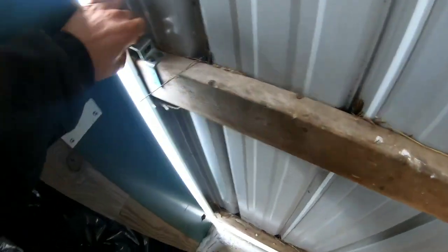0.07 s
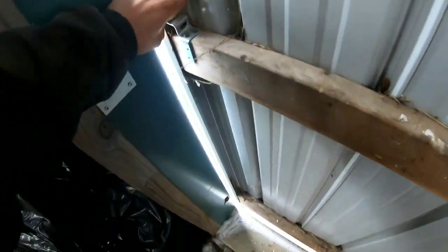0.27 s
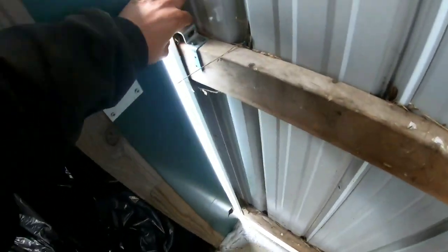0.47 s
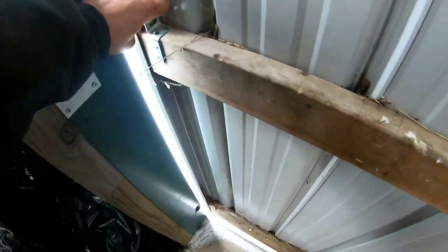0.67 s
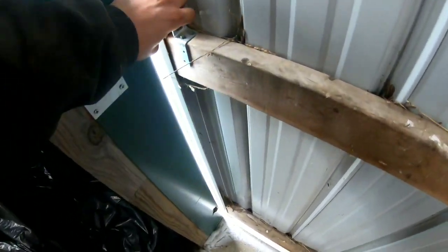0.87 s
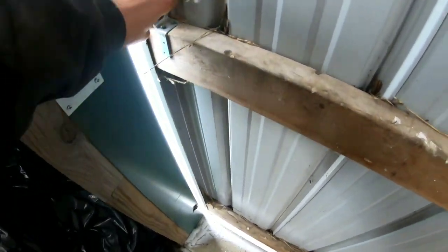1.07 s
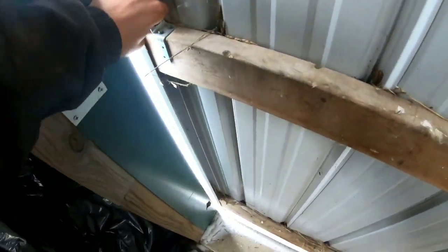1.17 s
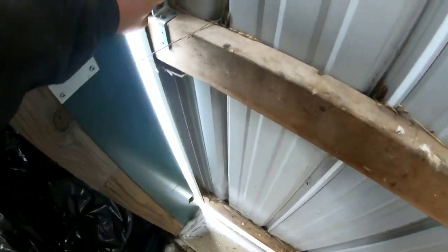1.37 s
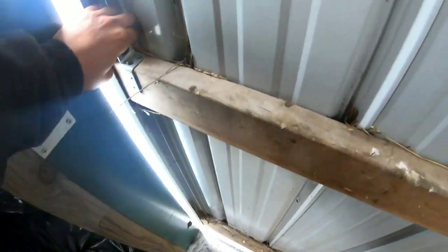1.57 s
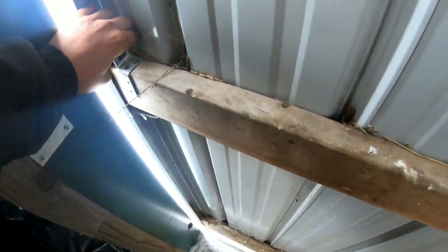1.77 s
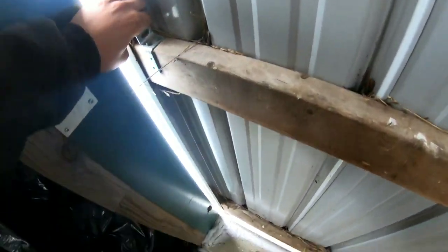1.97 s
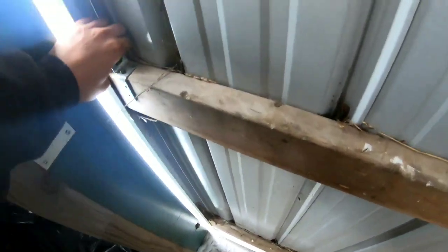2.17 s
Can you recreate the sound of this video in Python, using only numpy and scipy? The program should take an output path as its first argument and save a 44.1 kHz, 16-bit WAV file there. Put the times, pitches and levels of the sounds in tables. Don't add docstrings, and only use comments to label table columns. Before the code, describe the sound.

Close to a small camera microphone, a metal bolt knocks, chatters and rubs in its guides at uneven intervals, while shoves make the sheet-metal door boom deeply; the loudest clanks come early and late.

```python
import sys
import numpy as np
from scipy import signal
from scipy.fft import rfft, irfft
from scipy.io import wavfile
from scipy.ndimage import uniform_filter1d

SR = 44100
rng = np.random.default_rng(int(sys.argv[2]) if len(sys.argv) > 2 else 0)


def dump_mix(stems):
    frames = np.atleast_2d(stems).T
    limited = np.clip(frames, -1, 1)
    pcm = np.round(limited * 32767).astype(np.int16)
    wavfile.write(sys.argv[1], SR, pcm)


def how_loud(loudness_db):
    steps = np.asarray(loudness_db, float) / 20
    return 10 ** steps


N = 97372

# frequency in Hz, density in dB per Hz.
BLOW_SPECTRUM = [(120, -24), (200, 6), (1040, -12), (1350, -14), (2800, -14), (4200, -20), (4680, -14),
                 (6880, -21), (16000, -49)]
SMEAR_S = 0.0012
LEAD_S = 0.03


def bolt():
    # time in s, strength in dB, dull part in dB, bright part in dB, chatter length in s.
    knocks = [(.2795, -18, -10.5, -5, 0.015), (.299, -2.5, -17, -16.5, 0.012),
              (.6645, -20.5, -6.5, -25, 0.0066), (.922, -16.5, -7, -25.5, 0.0042),
              (1.118, -16, -9, -2, 0.01), (1.3575, -15.5, -23.5, -26, 0.007),
              (1.503, -7.5, -11.5, -34.5, 0.0078), (1.566, -12, -36, -9.5, 0.0068),
              (1.709, -13.5, -17.5, -24, 0.0053), (1.7835, -18.5, -12.5, -2.5, 0.007),
              (2.005, -12.5, -29.5, -21, 0.0079), (2.0535, -2, -12, -10.5, 0.0035),
              (2.1285, -12, -16, -11, 0.014), (2.138, -6.5, -37, -8.5, 0.0049)]
    # time in s, strength in dB, dull part in dB, bright part in dB, chatter length in s.
    ticks = [(.06, -31.5, -14.5, -18.5, 0.029), (.164, -34, -10.5, -56, 0.031),
             (.314, -40, -30, -19, 0.0089), (1.136, -37, -14, -9, 0.0065), (.367, -22, -8, -15, 0.018),
             (.416, -31, -20, -19.5, 0.013), (.713, -29.5, -13, -12.5, 0.0048),
             (.882, -16.5, -2.5, -44, 0.02), (1.019, -22.5, 10, -15, 0.018),
             (1.085, -25.5, -3, -20, 0.0039), (1.275, -38, -9, 2, 0.091), (1.325, -26, 0, -19, 0.02),
             (1.458, -26.5, -4, -41, .006), (1.869, -39.5, -25, -4, 0.013), (1.944, -27, 9.5, -1, 0.0084)]
    # middle in s, strength in dB rms, dull part in dB, bright part in dB, length in s.
    scrapes = [(0.262, -34.5, -4, -22, .04), (0.288, -28.5, -16, -32, 0.021), (.355, -32.5, -14, -25, .17),
               (0.639, -46, -5, -9, 0.072), (.965, -37, -1, -15, .05), (1.03, -32, -5.5, -14.5, .04),
               (1.11, -43, -10, -3, 0.028), (1.144, -44, -7.5, -1, 0.059), (1.34, -36, -5, -20, 0.032),
               (1.566, -39, -6, -11, 0.045), (1.767, -48, -5, 1, 0.032), (1.991, -38.5, 1, -15, 0.074),
               (2.025, -33.5, -12, -24, 0.047), (2.044, -30, -17, -15, .024), (2.117, -48, 7, -5, .03),
               (2.174, -42, -21, -34, 0.067)]
    # time in s, strength in dB, pitch in Hz, rattle length in s.
    clanks = [(0.162, -38.5, 800, 0.0093), (0.297, -20.5, 1400, 0.015), (0.295, -20.5, 4940, 0.013),
              (0.672, -28, 1700, 0.0039), (.923, -25.5, 1160, 0.027), (1.371, -30, 2550, 0.021),
              (1.503, -21, 1236, 0.017), (1.567, -22, 6330, 0.0066), (1.614, -44.5, 1880, 0.31),
              (0.673, -39, 3340, 0.0043), (1.825, -41.5, 1850, 0.037), (1.919, -46, 6300, 0.0056),
              (2.002, -21, 2420, 0.015), (2.013, -18, 520, .012), (2.053, -10.5, 1730, 0.00084),
              (2.054, -16, 5370, 0.0056), (2.127, -18, 1400, 0.018)]
    cracks, rings = np.zeros(N), np.zeros(N)
    for contacts, rise_s in ((knocks, 0.0005), (ticks, 0.002)):
        for s, *row in contacts:
            crack, rung = knock(*row, rise_s)
            add(cracks, s - LEAD_S, crack)
            add(rings, s - LEAD_S, rung)
    for s, db, dull_db, bright_db, length_s in scrapes:
        add(cracks, s - length_s / 2, scrape(db, dull_db, bright_db, length_s))
    for s, *row in clanks:
        add(rings, s, clank(*row))
    return cracks, rings


def knock(db, dull_db, bright_db, length_s, rise_s):
    # frequency in Hz, level in dB, t60 in s.
    latch = [(1400, -2, 0.46), (2080, -16.5, 0.22), (2780, -15.5, 0.25), (3580, 0.5, 0.65),
             (4620, 2.5, 0.093), (6700, -15, 0.094)]
    first_db, lead_db, lead_rise_s = 10, -23, 0.018
    treble_hz, treble_shorter = 7350, 0.73
    crack_db, latch_db = -3.5, -16.5
    t = np.arange(4096) / SR - LEAD_S
    after = np.maximum(t, 0)
    slide = how_loud(lead_db) * np.exp(np.minimum(t, 0) / lead_rise_s) * (t < 0)
    start = np.minimum((after + 1 / SR) / rise_s, 1) * (t >= 0)

    drive = chatter(4096)
    drive[np.argmax(t >= 0)] = how_loud(first_db)
    low = signal.sosfilt(signal.butter(2, treble_hz, fs=SR, output="sos"), drive)
    treble = drive - low
    low = low * (slide + start * np.exp(-after / length_s))
    treble = treble * start * np.exp(-after / (treble_shorter * length_s))

    crack = signal.fftconvolve(low + treble, smear(SMEAR_S))
    crack = signal.fftconvolve(crack, blow_colour(dull_db, bright_db))
    crack = how_loud(db + crack_db) * crack / np.abs(crack).max()
    rung = signal.fftconvolve(crack, ring(latch, damp=0.25, vary_db=4))
    return crack, how_loud(latch_db) * rung


def scrape(db, dull_db, bright_db, length_s):
    # frequency in Hz, gain in dB.
    dulling = [(8500, -4), (16000, -5)]
    swell = np.sin(np.pi * np.clip(np.arange(8192) / SR / length_s, 0, 1)) ** 2
    slips = signal.fftconvolve(chatter(8192), blow_colour(dull_db, bright_db, dulling))[:8192]
    return how_loud(db) * swell * evened(slips)


def clank(db, hz, length_s):
    mode_cycles = 2.23
    t = np.arange(8192) / SR
    drive = chatter(8192) * np.exp(-t / max(length_s, 0.001))
    mode = t * np.sin(2 * np.pi * hz * t) * np.exp(-2 * t * hz / mode_cycles)
    sound = signal.fftconvolve(drive, mode)
    return how_loud(db) * sound / np.abs(sound).max()


def chatter(size):
    return clicks(per_s=9000, spread_db=3, size=size)


def blow_colour(dull_db, bright_db, *more):
    tilt = [(800, dull_db + 10.5), (2700, 0), (8000, bright_db + 10.5)]  # (Hz, dB)
    return colour(BLOW_SPECTRUM, tilt, *more)


def sheet():
    # frequency in Hz, t60 in s.
    decay = [(300, 0.42), (800, 0.22), (2000, 0.24), (5000, 0.13), (12000, 0.12)]
    hz, t, z = signal.stft(rng.standard_normal(16384), SR, nperseg=256)
    fade = how_loud(-60 * t / read(decay, hz)[:, None])
    return unit(signal.istft(z * fade, SR, nperseg=256)[1])


def rubbing():
    # frequency in Hz, density in dB per Hz.
    spectrum = [(230, -20.5), (450, -13), (1200, -17.5), (2170, -27), (3600, -28.5), (4120, -32),
                (8300, -42.5), (9300, -53.5), (16000, -60)]
    # frequency in Hz, level in dB, t60 in s.
    modes = [(1450, -4, .008), (4800, 0, 0.01), (6900, -9, 0.008)]
    ring_db, hiss, patch_db, level_db = -14, 0.76, 3.1, 9
    slips = evened(clicks(per_s=3000, spread_db=2, size=N)) + hiss * rng.standard_normal(N)
    slips = slips + how_loud(ring_db) * signal.fftconvolve(slips, ring(modes, size=2048))[:N]
    z = signal.stft(signal.fftconvolve(slips, colour(spectrum))[:N], nperseg=256)[2]
    patches = rng.standard_normal(z.shape[::-1]).T
    patches = uniform_filter1d(patches, size=12, axis=1)
    patches = uniform_filter1d(patches, size=16, axis=0)
    rough = signal.istft(z * how_loud(patch_db * evened(patches)), nperseg=256)[1][:N]
    return hand(column=2) * evened(rough) * how_loud(level_db)


def hand(column):
    # time in s, shaking in dB, rubbing in dB.
    moves = [(0, -23, -48.5), (.1, -26, -62.5), (.145, -29, -69.5), (0.174, -32.5, -60.5),
             (.42, -25.5, -51.5), (0.531, -32.5, -57.5), (0.649, -27, -55), (0.839, -33.5, -57),
             (1.001, -19, -52.5), (1.161, -27.5, -59), (1.25, -29.5, -68), (1.3, -29.5, -59),
             (1.44, -24.5, -59.5), (1.618, -21.5, -55.5), (1.82, -29.5, -55.5), (1.91, -32.5, -65.5),
             (2.03, -29, -53), (2.2, -27, -49)]
    return how_loud(np.interp(np.arange(N) / SR, *np.transpose(moves)[[0, column]]))


def door():
    # time in s, strength in dB, contact time in s, upper panels in dB, struck panel's pitch in Hz.
    shoves = [(0.001, -13.5, 0.0014, -1, 163), (0.28, -14, 0.0013, -19, 122),
              (0.329, -14.5, 0.00083, 0.5, 140), (0.402, -23, 0.002, 9, 146),
              (0.663, -9.5, 0.00036, -4, 105), (0.7, -13, 0.00048, -12, 150), (0.788, -20, 0.005, 4.5, 124),
              (0.882, -35, 0.0035, -6, 114), (0.956, -13, 0.0053, 13, 122), (1.016, -6, 0.0028, 9.5, 179.5),
              (1.096, -19.5, 0.002, -15, 134), (1.13, -15.5, 0.0026, 1.5, 132),
              (1.335, -11, 0.003, -10.5, 110), (1.505, -5.5, 0.0009, -39, 110),
              (1.557, -18, 0.0022, -3, 138), (1.692, -29, 0.00061, -24, 123), (1.779, -22, 0.0031, 6, 163),
              (1.945, -14, 0.001, -35.5, 114), (2, -9, 0.00076, 0, 119), (2.02, -11.5, 0.0011, 28, 181.7),
              (2.052, -4.5, 0.00082, 8, 228), (2.138, -12, 0.00071, 19.5, 144.6)]
    # frequency in Hz, level in dB, t60 in s.
    leaf = [(110, -5, 0.076), (142, -10.5, 0.16), (167, -7, 0.1), (202.4, -10.5, 0.12), (323, -25, 0.074),
            (357, -26, 0.096), (520, -32, 0.088)]
    # frequency in Hz, level in dB, t60 in s.
    lowest = [(30, -5, .16), (49, 0, .2), (64, -4, .13)]
    shake_db, shake_low_db = -2, -7
    shove_db, shove_low_db = -2, -22
    panel_t60_s = 0.12
    jolts = clicks(per_s=800, spread_db=1.1, size=N)
    shaken = signal.fftconvolve(jolts, ring(softer(lowest, shake_low_db) + leaf, count=1))[:N]
    out = hand(column=1) * steadied(shaken) * how_loud(shake_db)

    t = np.arange(16384) / SR
    for s, db, contact_s, panel_db, hz in shoves:
        u = np.arange(2048) / SR / max(contact_s, 0.0005)
        push = u * np.exp(-3 * u)
        panel = unit(-np.sin(2 * np.pi * hz * t) * how_loud(-60 * t / panel_t60_s))
        body = ring(softer(lowest, shove_low_db) + leaf, vary_db=3.1, count=1)
        boom = signal.fftconvolve(push, body + how_loud(panel_db) * panel)
        add(out, s, how_loud(db + shove_db) * boom / np.abs(boom).max())
    return out + sways()


def sways():
    # time in s, strength in dB, pitch in Hz, t60 in s.
    swings = [(-.002, -8.5, 56, 0.14), (0.084, -17.5, 52, 0.22), (0.199, -18, 50.5, 0.39),
              (0.291, -17.5, 55.6, 0.37), (0.392, -19.5, 56, 0.33), (.56, -23.5, 47.7, 0.25),
              (0.649, -14, 48.6, 0.33), (.71, -13, 58, 0.21), (.79, -16, 54.6, 0.39),
              (0.879, -19.5, 61, 0.49), (0.949, -18.5, 51.2, 0.43), (1.02, -12, 51.6, 0.14),
              (1.092, -13, 55.5, 0.33), (1.27, -21, 49.2, 0.34), (1.331, -18, 56.2, 0.65),
              (1.42, -34, 60, 0.18), (1.502, -8, 53, 0.32), (1.56, -25.5, 61.7, 0.21),
              (1.641, -17.5, 49.4, 0.36), (1.685, -20, 49.4, 0.38), (1.768, -14.5, 49.6, 0.26),
              (1.871, -21, 47, 0.38), (1.939, -18, 54, 0.32), (1.995, -17, 50, 0.17),
              (2.085, -11.5, 56.6, 0.16), (2.169, -19, 49.6, 0.15)]
    rise_s = 0.004
    out, t = np.zeros(N), np.arange(16384) / SR
    for s, db, hz, t60_s in swings:
        onset = np.tanh(t / rise_s + (s < 0))
        add(out, s, how_loud(db - 60 * t / t60_s) * onset * np.cos(2 * np.pi * hz * t))
    return out


def softer(modes, db):
    return [(hz, level_db + db, t60_s) for hz, level_db, t60_s in modes]


def ring(modes, damp=1, vary_db=0, size=16384, count=3):
    scatter = 0.045
    hz, db, t60_s = np.transpose(modes * count)[:, :, None]
    t = np.arange(size) / SR
    vary, sign, off = rng.standard_normal((3, *db.shape))
    fade = how_loud(db + vary_db * vary - 60 * t / (damp * np.minimum(t60_s, 0.6)))
    sines = np.sin(2 * np.pi * hz * (1 + scatter * off) * t)
    return unit((np.sign(sign) * fade * sines).sum(0))


def smear(length_s):
    z = rfft(rng.standard_normal(1024) * np.exp(-np.arange(1024) / SR / length_s))
    return unit(irfft(z / np.sqrt(np.abs(z) + 1e-9))[:512])


def clicks(per_s, spread_db, size):
    hit = rng.random(size) < per_s / SR
    excess = np.minimum(rng.exponential(1, size), 4)
    return hit * how_loud(spread_db * excess) * rng.choice([-1, 1], size)


def colour(*tables, size=2048):
    hz = np.abs(np.fft.fftfreq(size, 1 / SR))
    db = np.maximum(sum(read(points, hz) for points in tables), -100)
    spectrum = np.exp(np.conj(signal.hilbert(np.log(how_loud(db)))))
    return unit(np.fft.ifft(spectrum).real[:size // 2])


def read(points, hz):
    f, value = np.transpose(points)
    return np.interp(np.log(hz + 1), np.log(f + 1), value)


def steadied(x):
    power = np.abs(uniform_filter1d(x ** 2, size=4096)) + 1e-12
    return evened(x / power ** 0.3)


def evened(x):
    return x / np.sqrt(np.mean(x ** 2) + 1e-20)


def unit(x):
    return x / np.sqrt(np.sum(x ** 2) + 1e-20)


def add(mix, s, sound):
    at = round(s * SR)
    sound = sound[max(-at, 0):]
    part = mix[max(at, 0):][:len(sound)]
    part += sound[:len(part)]


def scene():
    # time in s, level in dB.
    width = [(0, -44), (1.051, -47), (1.121, -32), (1.3, -49), (1.5, -13), (2, -1.5), (2.2, -1.5)]
    sheet_db, side_low_hz, lean, side_turns_per_s = -8, 886, 0.17, 4.3
    t = np.arange(N) / SR
    cracks, rings = bolt()
    centre = cracks + rings + rubbing()
    centre = centre + how_loud(sheet_db) * signal.fftconvolve(cracks, sheet())[:N]

    turn = 2 * np.pi * side_turns_per_s * t
    side = lean * centre
    for wave in (np.sin, np.cos):
        side = side + wave(turn) * signal.fftconvolve(centre, smear(SMEAR_S / 2))[:N]
    side = signal.sosfilt(signal.butter(4, side_low_hz, "high", fs=SR, output="sos"), side)
    side = side * how_loud(np.interp(t, *np.transpose(width)))
    centre = centre + door()
    return np.array([centre + side, centre - side])


def top_cut(x):
    return signal.sosfilt(signal.butter(12, 16230, fs=SR, output="sos"), x)


def record(dry):
    # frequency in Hz, gain in dB.
    mic = [(8000, -2), (11000, -2), (14000, -3), (15600, -14), (16400, -45)]
    cut = signal.sosfilt(signal.butter(2, 5.4, "high", fs=SR, output="sos"), dry)
    response = colour(mic, size=256)
    response = response / response.sum()
    mix = signal.fftconvolve(np.tanh(cut), response[None])[:, :N]
    return top_cut(mix)


dry = scene()
out = record(dry)
dump_mix(out)
```